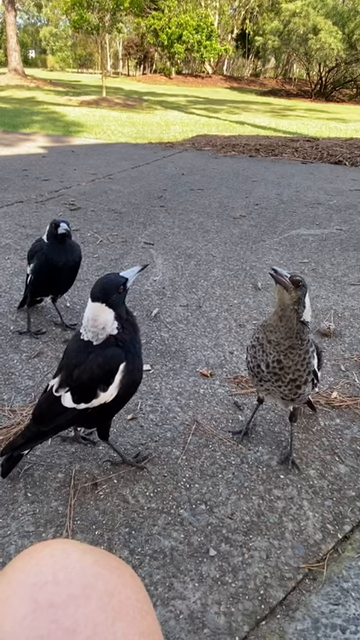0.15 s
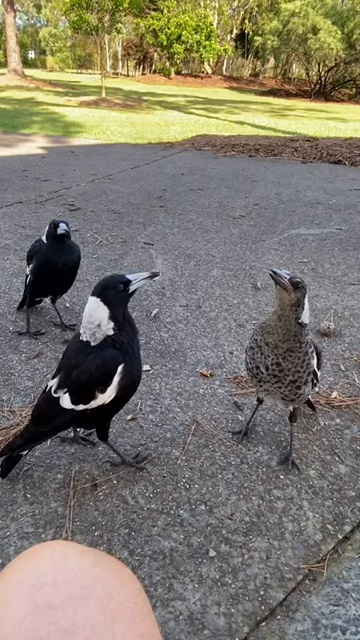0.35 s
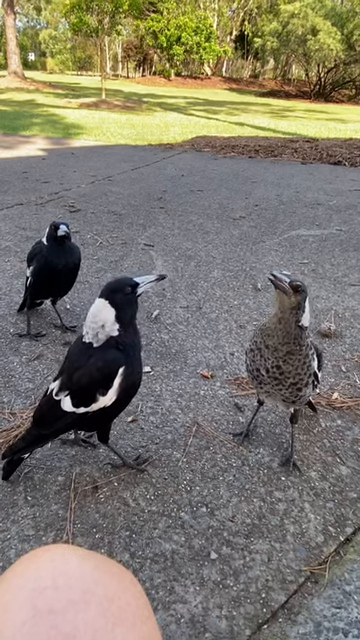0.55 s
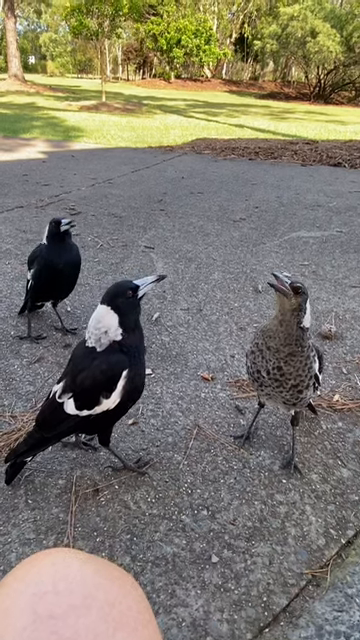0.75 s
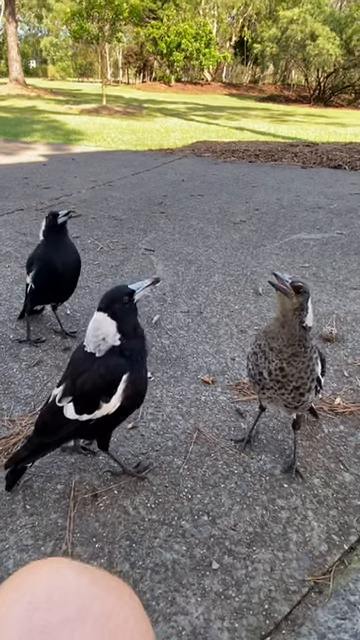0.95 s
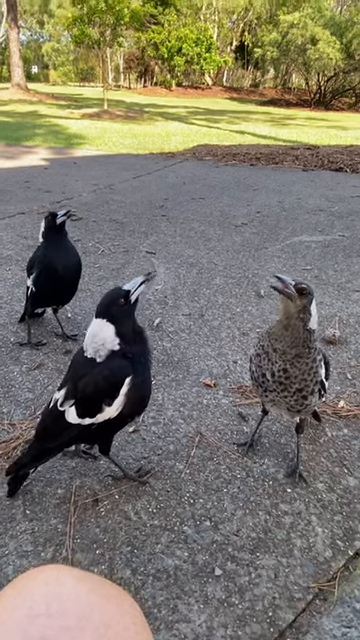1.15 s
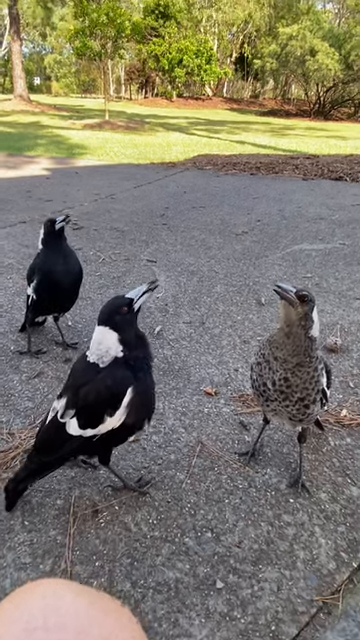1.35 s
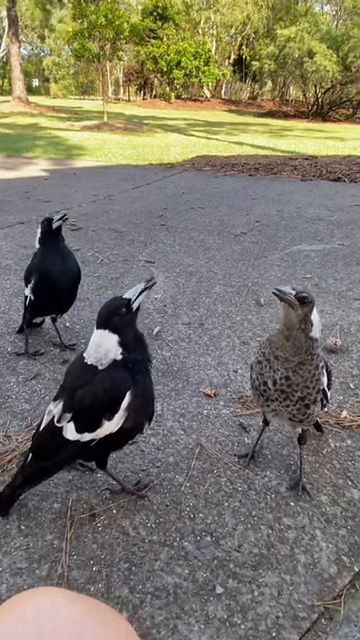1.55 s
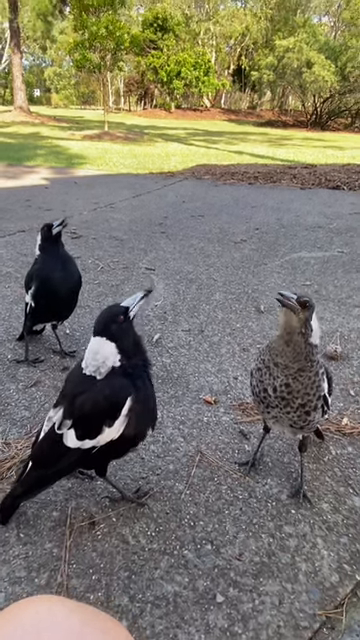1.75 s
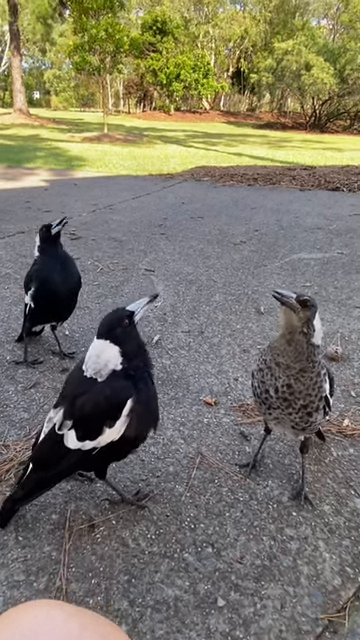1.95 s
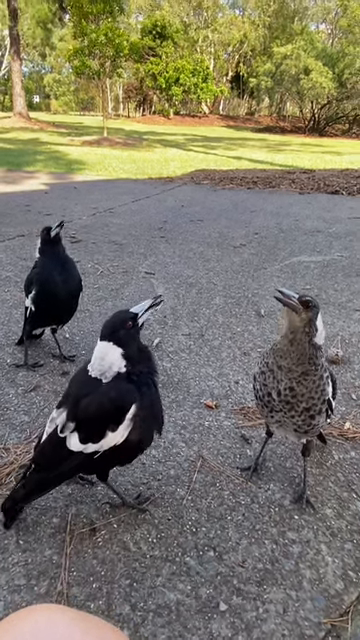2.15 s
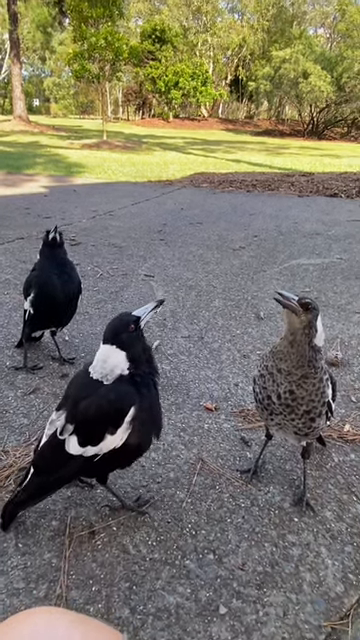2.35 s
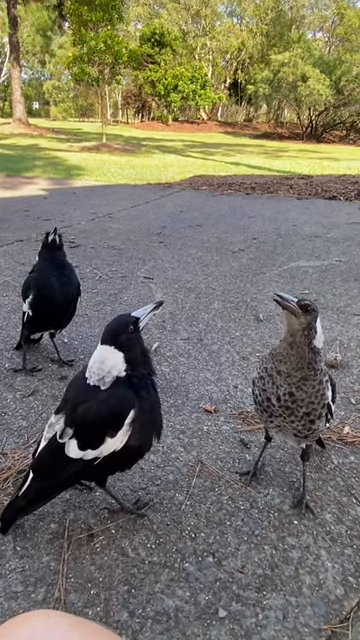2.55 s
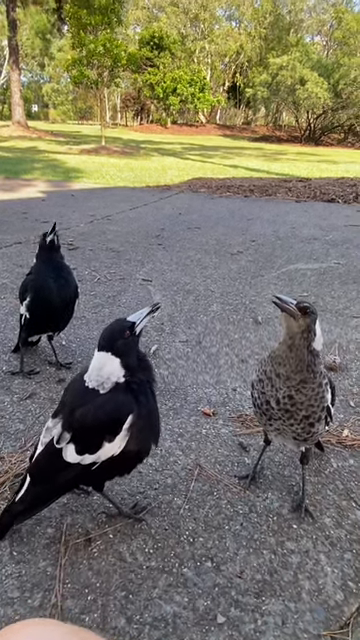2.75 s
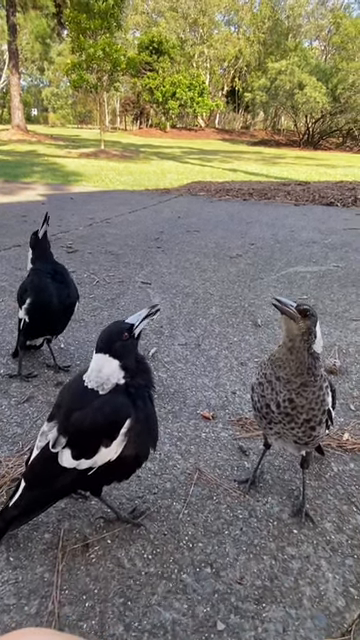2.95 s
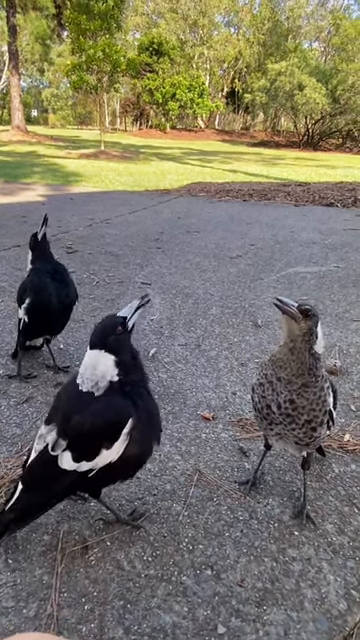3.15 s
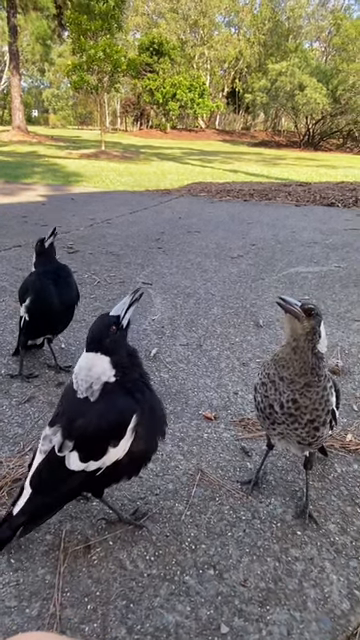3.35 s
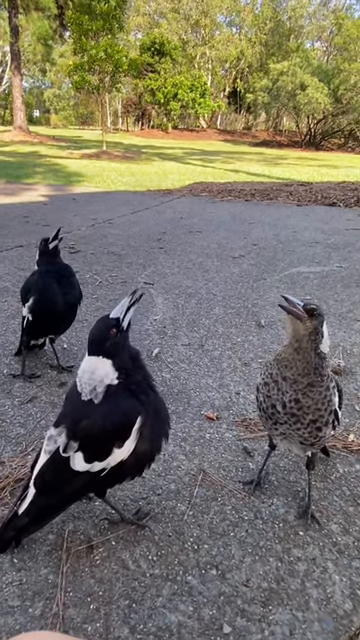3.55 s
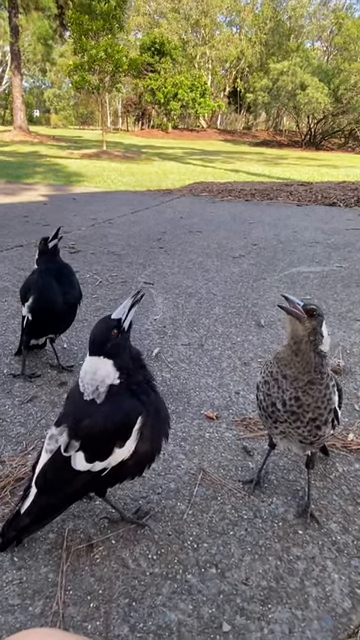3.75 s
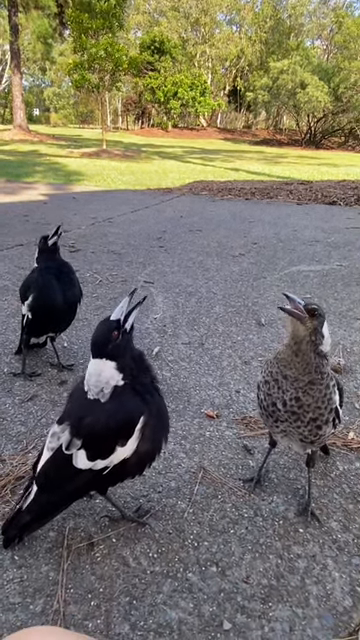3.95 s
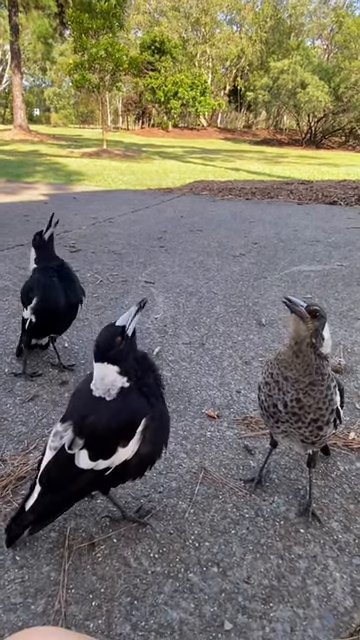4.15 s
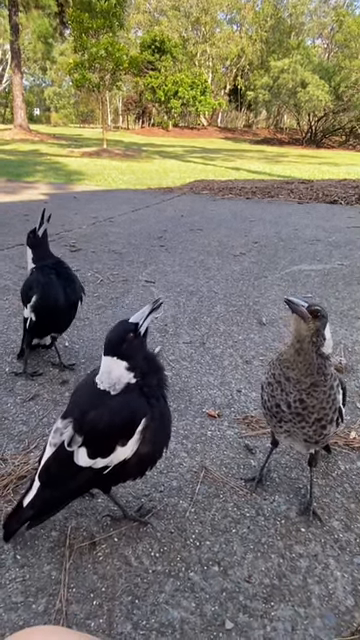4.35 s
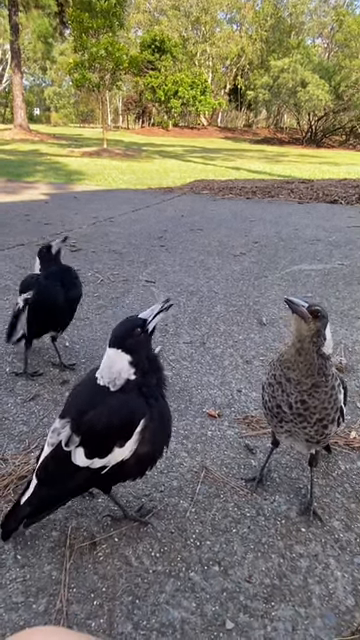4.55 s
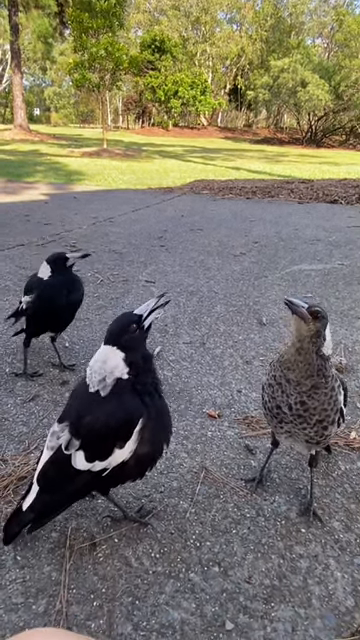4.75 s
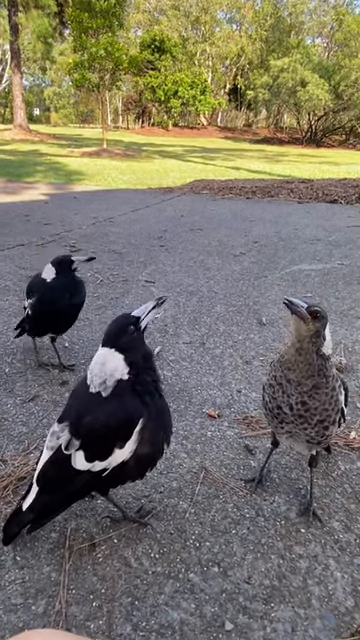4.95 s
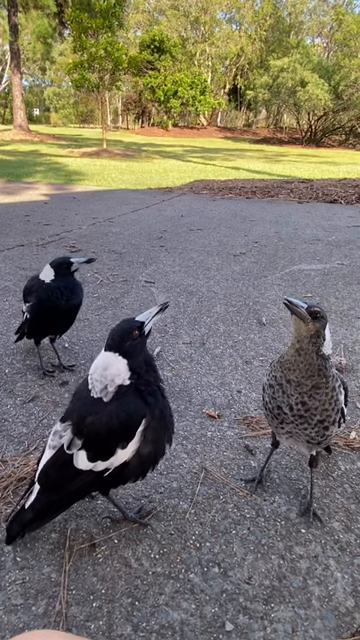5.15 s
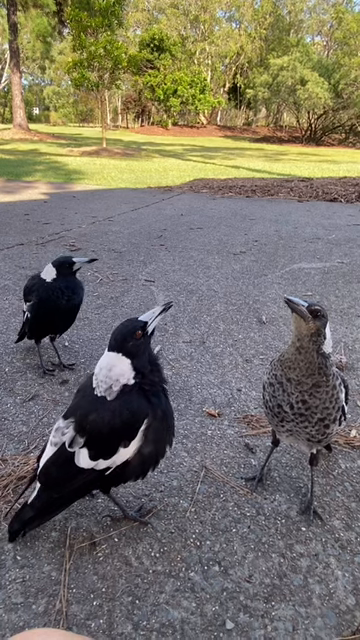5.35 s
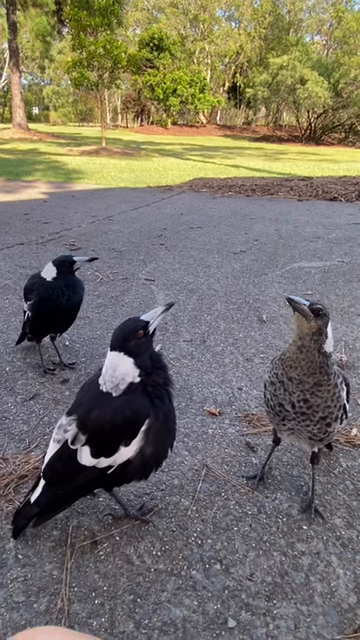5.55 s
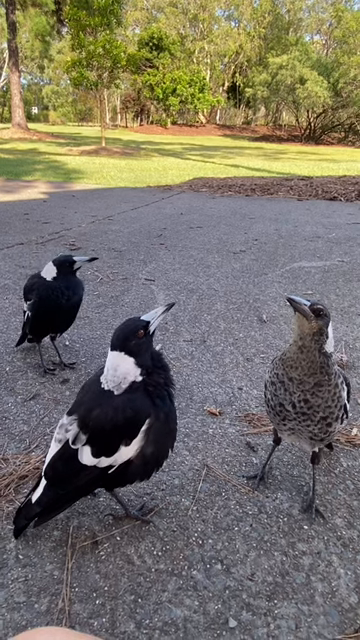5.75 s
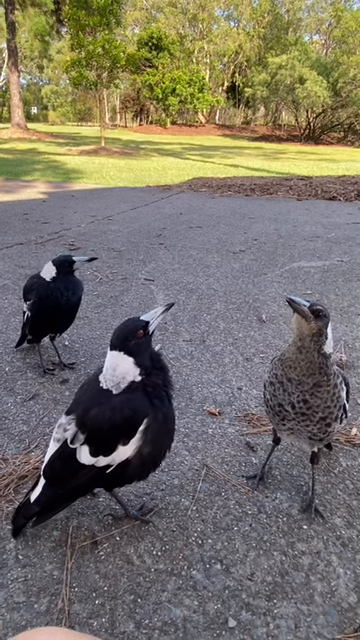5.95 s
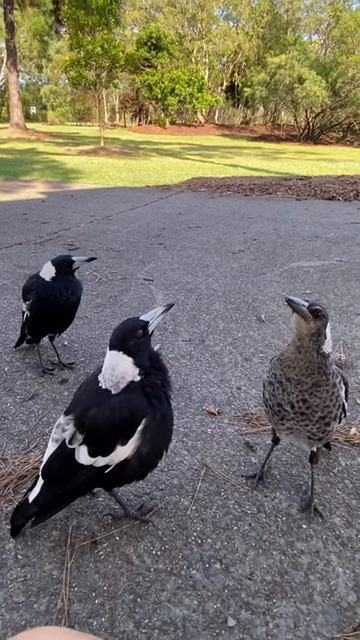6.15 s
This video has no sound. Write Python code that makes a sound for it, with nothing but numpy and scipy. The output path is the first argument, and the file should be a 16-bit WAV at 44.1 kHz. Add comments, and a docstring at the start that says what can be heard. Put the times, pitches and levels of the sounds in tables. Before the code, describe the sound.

Outdoors in a park, a magpie a step from the microphone, slightly left, carols loudly: quick fluty burbles and yodelling flips at first, then longer throbbing, gliding whistles. A second bird further off adds softer notes from the other side. Behind lie a thin cicada hiss and a far traffic and engine drone, which sink midway. The singing fades, and one faint distant chirp follows.

```python
"""Cicadas hiss in the trees of a park over a far engine drone and traffic; then liquid, gliding whistles stand in front.
A magpie carols a step from the microphone, with another further off; one faint distant chirp ends it.
Many notes throb as both sides of the syrinx beat; overtones and rushing air colour them. Dense tymbal clicks blur
into the hiss, and shaped noise makes the road. This background sinks midway and then partly returns."""
import sys
import numpy as np
from scipy import signal
from scipy.fft import rfft, irfft
from scipy.io import wavfile
from scipy.ndimage import uniform_filter1d

SR = 44100
rng = np.random.default_rng(int(sys.argv[2]) if len(sys.argv) > 2 else 0)


def log_audio(samples):
    """Write samples as a 16-bit WAV file to the path given in sys.argv[1]."""
    # one column per channel
    frames = np.atleast_2d(samples).T
    # limit to full scale, then quantise
    limited = np.clip(frames, -1, 1)
    pcm = np.round(limited * 32767).astype(np.int16)
    wavfile.write(sys.argv[1], SR, pcm)


def volts(x):
    """Linear amplitude factor 10**(x/20) for a level x in dB, scalar or array-like."""
    e = np.asarray(x, float) / 20
    return 10 ** e


N = 273420

# drawn notes, long, throbbing or warbling, each with its own pitch line: singer,
# throb (start_hz, end_hz, lower_side_tone_db, upper_side_tone_db, overtone_base_hz) or empty,
# line of (time_s, pitch_hz, level_db)
DRAWN_NOTES = [ ("near", (72, 72, -14, -5, 914.5), [(0.692, 906, -25), (0.715, 892, -18),
               (0.77, 885, -17.5), (0.797, 894, -27)]), ("near", (), [(1.15, 1012, -16), (1.175, 1009, -12),
               (1.235, 1003, -12), (1.262, 982, -24)]), ("near", (), [(1.388, 900, -31), (1.397, 780, -29),
               (1.406, 1250, -25), (1.415, 780, -25), (1.424, 970, -19), (1.437, 830, -23),
               (1.446, 1000, -19), (1.458, 980, -23)]), ("near", (83.5, 86, -8, -12, 1159),
               [(1.625, 1167, -17.5), (1.674, 1180, -14), (1.711, 1140, -13.5), (1.76, 1140, -17)]),
               ("far", (91, 95, -11, -13.5, 1089), [(1.76, 1131, -19.5), (1.805, 1093, -19.5),
               (1.85, 1032, -28.5)]), ("near", (82, 62, -9, -2, 680), [(1.905, 766, -28),
               (1.95, 712, -22.5), (2.1, 699, -24), (2.152, 680, -31)]), ("near", (), [(2.24, 800, -35),
               (2.257, 1000, -24), (2.268, 800, -25), (2.277, 1050, -25), (2.286, 720, -30),
               (2.293, 900, -26), (2.302, 760, -28)]), ("near", (78, 90, -13, -6, 851.5),
               [(2.42, 902, -28.5), (2.471, 853, -14.5), (2.52, 848, -13), (2.555, 828, -23)]),
               ("near", (68.5, 68, -13, 0, 853.5), [(2.706, 970, -18), (2.736, 860, -18), (2.75, 815, -27),
               (2.78, 745, -36)]), ("near", (93, 58, -9, 1, 812), [(2.89, 935, -16), (2.955, 862, -17),
               (3.008, 823, -19.5), (3.115, 814, -22), (3.175, 800, -25)]),
               ("near", (80, 81.5, 1, -10, 1268), [(3.335, 1233, -15.5), (3.412, 1213, -12),
               (3.542, 1187, -16.5), (3.738, 1141, -19), (3.815, 1159, -23)]),
               ("far", (85, 88.5, -17, -15, 1471.5), [(3.8, 1550, -30.5), (3.9, 1495, -28.5),
               (4.002, 1420, -22), (4.065, 1478, -27), (4.14, 1415, -30)]), ("near", (), [(3.82, 1197, -26),
               (3.883, 1140, -17.5), (3.935, 1124, -17.5), (3.987, 1111, -20), (4.05, 1101, -32)]),
               ("near", (130, 215, -26, -1, 897), [(4.09, 914, -32), (4.17, 893, -28.5),
               (4.25, 893, -32.5)]), ("near", (135, 85, -15, -21, 1230), [(4.15, 1330, -20),
               (4.18, 1245, -16.5), (4.239, 1195, -15), (4.272, 1182, -15.5)]), ("near", (),
               [(4.272, 1182, -15.5), (4.35, 1170, -19), (4.42, 1156, -18.5), (4.468, 1122, -29)]),
               ("near", (59.5, 62.5, -1, -1, 1270), [(4.68, 1192, -40), (4.751, 1222, -30.5),
               (4.81, 1174, -26), (4.869, 1206, -26), (4.94, 1183, -39.5)]),
               ("near", (89, 88, -10, -22, 981.5), [(4.93, 972, -37), (4.988, 1002, -30.5),
               (5.035, 978, -23.5), (5.14, 956, -15.5)]), ("near", (), [(5.14, 943, -16.5),
               (5.185, 928, -16.5), (5.23, 931, -16.5)]), ("near", (92, 55, -18, -4, 929),
               [(5.23, 925, -20), (5.301, 926, -20.5), (5.419, 916, -23), (5.49, 882, -35.5)]),
               ("distant", (), [(5.855, 1380, -50), (5.91, 1510, -40), (5.945, 1530, -43)]), ]
# throb of a steady note, its side tones too weak to beat: start_hz, end_hz, lower_side_tone_db, upper_side_tone_db
STEADY_THROB = (80, 80, -50, -50)
# short clear whistles: singer, start_s, length_s, from_hz, to_hz, peak_db
SHORT_WHISTLES = [ ("near", .53, .085, 646, 711, -36), ("near", .55, .065, 800, 877, -29),
                  ("near", .614, .018, 850, 1000, -21), ("near", .64, .01, 760, 1050, -24),
                  ("near", .658, .018, 835, 812, -21), ("near", .855, .02, 1300, 1345, -21),
                  ("near", .867, .016, 990, 950, -21), ("near", .88, .018, 1200, 1137, -18),
                  ("near", .888, .017, 800, 740, -26), ("near", .903, .012, 1000, 840, -18),
                  ("near", 1.022, .023, 1002, 874, -18), ("near", 1.043, .022, 1300, 1400, -17),
                  ("near", 1.06, .045, 945, 955, -21), ("far", 1.152, .03, 1530, 1500, -20),
                  ("near", 1.335, .018, 930, 940, -28), ("near", 1.354, .013, 920, 800, -24),
                  ("near", 1.37, .014, 1200, 1060, -23), ("near", 1.382, .015, 1310, 1350, -24),
                  ("far", 1.5, .06, 925, 964, -20), ("far", 1.56, .065, 1003, 1015, -16),
                  ("near", 1.775, .045, 898, 898, -18.5), ("near", 1.825, .025, 1800, 2050, -38),
                  ("near", 1.845, .05, 1093, 1052, -15), ("near", 2.305, .018, 1220, 1140, -22),
                  ("near", 2.322, .01, 1480, 1700, -30), ("near", 2.332, .018, 1360, 1277, -23),
                  ("near", 2.342, .016, 1000, 940, -28), ("near", 2.355, .02, 1133, 1135, -19),
                  ("near", 2.374, .052, 751, 756, -18), ("near", 2.835, .022, 970, 993, -27),
                  ("near", 2.853, .015, 1540, 1416, -17), ("near", 2.864, .015, 1280, 1340, -7),
                  ("near", 2.879, .015, 1370, 1430, -13), ("near", 3.188, .026, 980, 1000, -19),
                  ("near", 3.215, .018, 950, 1080, -13), ("near", 3.272, .055, 1360, 1365, -21),
                  ("near", 4.0, .065, 1260, 1370, -32), ("near", 4.05, .09, 1165, 1310, -29),
                  ("near", 4.135, .016, 1500, 1420, -23)]
# short two-voiced burbles: singer, start_s, length_s, pitch_hz, second_voice_offset_hz (minus is below), peak_db
TWO_VOICED_BURBLES = [ ("near", .803, .042, 1340, -95, -21), ("near", .94, .08, 820, -55, -18),
                      ("near", 1.068, .026, 1370, -150, -23), ("near", 1.1, .055, 1950, -170, -28),
                      ("near", 1.105, .045, 930, 110, -20), ("near", 1.112, .035, 1250, 120, -31),
                      ("far", 1.18, .03, 1560, -160, -27), ("near", 1.54, .085, 1150, -85, -19),
                      ("near", 2.565, .06, 780, 86, -30), ("near", 2.625, .075, 1355, -105, -31),
                      ("near", 3.235, .028, 1060, -140, -15), ("near", 4.615, .065, 965, 100, -29)]
# rise and fall of a short note: opening_below_peak_db, peak_at (share of length), ending_below_peak_db
WHISTLE_SHAPE = (7, .55, 5)
BURBLE_SHAPE = (5, .5, 5)
# head of the near bird: time_s, beak opening as overtone_db at 1 kHz pitch, turn as left_minus_right_db
NEAR_HEAD = [(.6, -33, 3.5), (1.12, -25, 3.3), (1.38, -36, 3.6), (1.58, -31, 4.8), (1.8, -30, 4.6),
             (2.05, -28, 3.1), (2.35, -34, 3.3), (2.6, -36, 2.7), (2.75, -33, 3.5), (2.845, -14, 5),
             (2.88, -29, 4.3), (3.03, -17, 4), (3.22, -28, 5.3), (3.3, -21, 4), (3.57, -24, 4.3),
             (3.93, -28, 4.6), (4.05, -23, 4), (4.17, -28, 3.6), (4.3, -28, 4), (4.8, -23, 4),
             (5.03, -32, 2.4), (5.35, -29.5, 3.2)]
# birds further off, by singer: overtone_db at 1 kHz pitch, left_minus_right_db
FURTHER_BIRDS = {"far": (-27, -2.4), "distant": (-38, -2)}
# throat colour of the overtones: frequency_hz, level_db
THROAT = [(1400, -1), (1900, 3), (2500, -1.5), (3200, -10.5), (4400, 2.5), (6000, -5), (7400, -37.5),
          (8800, -6), (10500, -25.5), (11700, -8), (13000, -21.5), (15000, -29.5)]
# phase between the microphone's two sides: frequency_hz, left_lead_radians
LEFT_LEAD = [(0, 0), (1120, -.55), (2200, -.15), (4100, -.7), (4700, -2.4), (5500, .3), (6600, 2.9),
             (8300, 6.2), (15000, 9)]
# air rushing through rough notes: frequency_hz, density_db (per Hz)
BREATH_COLOUR = [(900, 4), (1600, -9), (2600, -10.5), (3500, -17.5), (5000, -8), (7000, -7.5),
                 (7600, -43.5), (8700, 1.5), (11000, -31.5), (13200, -14), (14500, -40)]
# thin hiss in the top octave beside some notes: start_s, length_s, level_db
HISS_TIMES = [(1.53, .09, -52), (2.87, .35, -42), (3.88, .12, -53), (4.13, .14, -53)]
# colour of that hiss: frequency_hz, density_db (per Hz)
HISS_COLOUR = [(11600, -25), (12300, 0), (13800, -2), (14400, -30)]
# cicada chorus, common to both ears and then opposed in them: frequency_hz, density_db (per Hz)
CICADAS_MID = [(2800, -34), (3900, -28.5), (4400, -4), (5100, 0), (6700, -0.5), (7400, -24.5),
               (8200, -11.5), (10200, -31), (11200, -63), (12200, -20.5), (13800, -22), (15000, -47)]
CICADAS_SIDE = [(2800, -27), (4000, -35), (4600, -9), (5500, -12), (6800, 1), (7800, -10.5), (8300, -32),
                (11000, -56.5), (12200, -31), (15000, -30)]
# far traffic: frequency_hz, density_db (per Hz)
TRAFFIC_COLOUR = [(15, -51.5), (25, -27.5), (54, -12), (81, 2), (154, -15), (992, -29), (1300, -27.5),
                  (2130, -34), (3500, -47.5), (4550, -83)]
# engine resonances: pitch_hz, width_hz, level_db
ENGINE_LINES = [(65.5, 18, 1), (83.9, 3.3, -2), (129.9, 5.4, 1.5)]
# gains of the background over time: time_s, cicadas_db, road_db
BACKGROUND_GAINS = [(.14, -35.5, -36.5), (1, -36.5, -37.5), (2.2, -39, -40), (3.352, -38, -39.5),
                    (3.5, -42.5, -48), (4.501, -50, -50.5), (5.5, -47.5, -48), (6.2, -42, -45)]


def level(x, db):
    """Set the rms level."""
    return x * volts(db) / np.sqrt(np.mean(x ** 2))


def colour(x, points):
    """Shape the spectrum by (Hz, dB) points, joined over log frequency."""
    hz, db = np.transpose(points)
    bins = np.maximum(np.arange(N // 2 + 1) * SR / N, 1)
    gain = volts(np.interp(np.log(bins), np.log(hz), db, left=-90, right=-90))
    return irfft(rfft(x) * gain, N)


def walk(rate):
    """Random levels held 1 / rate s and slewed twice; spread near 1."""
    hold = int(SR / rate)
    steps = np.repeat(rng.standard_normal(N // hold + 1), hold)
    return 1.405 * uniform_filter1d(uniform_filter1d(steps, hold), hold)[:N]


def magpies():
    """All notes of the syrinx, a note begun inside another taking up its phase, with breath and top hiss."""
    song, air, phase = np.zeros((2, N)), np.zeros(N), np.zeros(N)
    drifts = walk(90), walk(320), walk(45)
    t = np.arange(N) / SR
    notes = carol()
    voices = {bird: np.zeros(N) for bird in ("near", *FURTHER_BIRDS)}  # notes sounding at once
    for bird, _, rows in notes:
        voices[bird] += (t > rows[0, 0]) * (t < rows[-1, 0])
    everyone = sum(voices.values())
    for bird, throb, rows in notes:
        rivals = np.maximum(voices[bird] - 1, 0) + .3 * (everyone - voices[bird])
        rivals = uniform_filter1d(rivals, SR // 100)
        span, sound, rush, turn = note(rows, pose(bird, rows), throb, phase, drifts, rivals)
        song[:, span] += sound
        air[span] += rush
        phase[span] = turn
    return song + air * breath() + top_hiss()


def carol():
    """Every note as (singer, throb, line), in time order; a burble is a voice with a second one beating on it."""
    sag_per_s = .25  # share of a burble's pitch lost each second
    second_voice_db, mirror_tone_db = -1.5, -14  # on the second voice's side, and opposite
    notes = [(bird, throb, np.array(rows)) for bird, throb, rows in DRAWN_NOTES]
    notes += [(bird, (), swell(*row, WHISTLE_SHAPE)) for bird, *row in SHORT_WHISTLES]
    for bird, start_s, length_s, hz, apart_hz, peak_db in TWO_VOICED_BURBLES:
        sag_hz = hz * sag_per_s * length_s / 2
        rows = swell(start_s, length_s, hz + sag_hz, hz - sag_hz, peak_db, BURBLE_SHAPE)
        tones_db = (mirror_tone_db, second_voice_db)
        if apart_hz < 0:
            tones_db = tones_db[::-1]
        throb = (abs(apart_hz), abs(apart_hz), *tones_db, np.mean(rows[:, 1]))
        notes.append((bird, throb, rows))
    return sorted(notes, key=lambda n: n[2][0, 0])


def swell(start_s, length_s, from_hz, to_hz, peak_db, shape):
    """Line (s, Hz, dB) of a short note: a straight glide that swells and sinks."""
    open_db, share, end_db = shape
    at = np.array([0, share, 1])
    time_s = start_s + at * length_s
    pitch_hz = from_hz + at * (to_hz - from_hz)
    level_db = peak_db - np.array([open_db, 0, end_db])
    return np.transpose([time_s, pitch_hz, level_db])


def pose(bird, rows):
    """Overtone level and direction of a note: an open beak and a high pitch sound brighter."""
    db_per_octave = 15
    quick_s, quick_dull_db = .06, -7  # full dulling up to half this length, none beyond it
    s, beak_db, turn_db = np.transpose(NEAR_HEAD)
    middle = (rows[0, 0] + rows[-1, 0]) / 2
    near = np.interp(middle, s, beak_db), np.interp(middle, s, turn_db)
    bright_db, pan_db = near if bird == "near" else FURTHER_BIRDS[bird]
    octaves = np.log2(np.mean(rows[:, 1]) / 1000)
    quick = np.clip(2 - 2 * (rows[-1, 0] - rows[0, 0]) / quick_s, 0, 1)
    return bright_db + db_per_octave * octaves + quick_dull_db * quick, pan_db


def note(rows, bright_pan_db, throb, phase, drifts, rivals):
    """One whistle with side tones one throb apart and overtones; also its breath level and running phase."""
    s, hz, db = np.transpose(rows)
    bright_db, pan_db = bright_pan_db
    throb_hz, end_hz, low_db, up_db, base_hz = throb or (*STEADY_THROB, np.mean(hz))
    length_s = s[-1] - s[0]
    edge_s = min(.008, .3 * length_s)
    span = slice(int((s[0] - edge_s) * SR), int((s[-1] + edge_s) * SR))
    t = np.arange(span.start, span.stop) / SR
    fade = np.sin(np.pi / 4 * np.clip(1 + np.minimum(t - s[0], s[-1] - t) / edge_s, 0, 2)) ** 2

    waver, flutter, patches = drifts
    low, up = volts(low_db), volts(up_db)
    rough = min(low + up, 1)
    shaky = rough * min(.07 / length_s, 1) ** 2  # short burbles waver, long rolls hold steady
    pitch = np.interp(t, s, hz) * (1 + (.0006 + .001 * rough + .025 * shaky) * waver[span])
    turn = phase[span.start] + 2 * np.pi * np.cumsum(pitch) / SR
    line_db = np.interp(t, s, db)
    size = np.sqrt(2) * volts(line_db + (.2 + 1.6 * shaky) * flutter[span]) * fade

    throb_rate = np.linspace(throb_hz, end_hz, len(t)) * (1 + (.012 + .15 * shaky) * waver[::-1][span])
    throb_turn = 2 * np.pi * np.cumsum(throb_rate) / SR + (np.pi if up > low else 0)  # opens from a lull
    beat = np.exp(1j * throb_turn)
    under = low * np.exp(-2.8j) / beat
    ladder = min(volts(-7) * up, .35)  # each further upper side tone is this much weaker
    body = 1 + up * beat / (1 - ladder * beat) + under * (1 + volts(-13) * under)

    sides = np.array([[1], [-1]])
    # the left's lead follows the turn of the head, full at 4.2 dB
    lead = np.interp(np.mean(hz), *np.transpose(LEFT_LEAD)) * pan_db / 4.2
    whistle = np.real(body * np.exp(1j * (turn + sides * lead / 2)))
    whistle = whistle / np.sqrt(1 + low ** 2 + up ** 2) * volts(sides * pan_db / 2)

    # overtone pitch swings once every throb, so overtones smear into pulsing bands
    stretch = base_hz / np.mean(hz)
    since_start = throb_turn - throb_turn[0]
    climb = -.04 * rough * (base_hz / 1000) ** 1.5 * np.sin(since_start)
    swept = 2 * np.pi * np.cumsum(stretch * pitch * (1 + climb)) / SR
    # ragged cycles, more so against another voice
    ragged = .03 + .26 * rough + .45 * shaky + .35 * rivals[span]
    swept = swept + ragged * flutter[::-1][span]
    pulse = 1 - .55 * rough * np.cos(since_start - .7)
    pulse = pulse * volts(.4 * (line_db - max(db)))  # softer singing is purer
    upper = overtones(hz, stretch, pitch, swept, bright_db, patches, span)
    return span, (whistle + pulse * upper) * size, size * pulse * rough * volts(bright_db), turn


def overtones(hz, stretch, pitch, swept, bright_db, patches, span):
    """Harmonics of the whistle, filtered by the throat; each comes and goes on its own."""
    throat_hz, throat_db = np.transpose(THROAT)
    sides = np.array([[1], [-1]])
    pan = volts(sides * -1.6 / 2)  # the microphone favours the right above the whistle
    total = np.zeros((2, len(pitch)))
    for k in range(2, int(throat_hz[-1] / max(hz) / stretch)):
        lead = np.interp(k * np.mean(hz), *np.transpose(LEFT_LEAD))
        gain_db = bright_db + np.interp(np.log(k * stretch * pitch), np.log(throat_hz), throat_db)
        gain_db = gain_db + 2.2 * np.roll(patches, k * SR // 5)[span]
        gain_db = gain_db - 2.5 * np.clip(k - 3, 0, 2)  # the fourth and up are weaker
        total += volts(gain_db) * pan * np.cos(k * swept + sides * lead / 2)
    return total


def breath():
    """Air rushing through the syrinx: coloured noise, mostly common to both ears."""
    mid, side = (level(colour(rng.standard_normal(N), BREATH_COLOUR), db) for db in (-5, -14))
    return np.array([mid + side, mid - side])


def top_hiss():
    """A thin high band of noise, independent in each ear, swelling in 20 ms and sinking over its later half."""
    t = np.arange(N) / SR
    size = np.zeros(N)
    for s, length, db in HISS_TIMES:
        size += volts(db) * np.clip(np.minimum((t - s) / .02, (s + length - t) / (.5 * length)), 0, 1)
    return size * np.array([level(colour(rng.standard_normal(N), HISS_COLOUR), 0) for _ in range(2)])


def park(x, t60_s=0.33, wet_db=-20.5, gap_s=0.01):
    """Scatter from paving and trunks: a short decaying noise tail, other in each ear."""
    t = np.arange(SR // 2) / SR
    tail = rng.standard_normal((2, len(t))) * np.exp(-np.log(1000) * t / t60_s) * (t > gap_s)
    tail = tail / np.sqrt(np.sum(tail ** 2) / 2)
    return x + volts(wet_db) * signal.fftconvolve(x, tail, axes=1)[:, :N]


def cicadas(points, balance_db, clicks_per_s, spread_db):
    """Dense uneven tymbal clicks ringing in the treble, blurred into a chorus."""
    clicks = (rng.random(N) < clicks_per_s / SR) * rng.standard_normal(N)
    clicks = clicks * volts(spread_db * rng.exponential(size=N))
    return level(colour(clicks * volts(walk(14)), points), balance_db)


def trees():
    """The chorus around the microphone: one part common to both ears, one opposed in them."""
    mid = cicadas(CICADAS_MID, 0.033, 9000, 0.4)
    side = cicadas(CICADAS_SIDE, 2.5, 5000, 1.8)
    return np.array([mid + side, mid - side])


def engine_drone():
    """Far engine: noise narrowed to a few low resonances."""
    hz = np.arange(N // 2 + 1) * SR / N
    lines = sum(volts(db) / np.sqrt(w) / (1 + (2 * (hz - f) / w) ** 2) for f, w, db in ENGINE_LINES)
    return level(irfft(rfft(rng.standard_normal(N)) * lines, N), -3.7)


def road():
    """Far traffic, nearly the same in both ears in the bass, wavering together with the engine drone."""
    mid = level(colour(rng.standard_normal(N), TRAFFIC_COLOUR), 0.66)
    high_pass = signal.butter(3, 520, "high", fs=SR, output="sos")
    wide = signal.sosfilt(high_pass, np.roll(mid, N // 3))
    side = .7 * wide + .04 * np.roll(mid, N // 2)
    return (mid + engine_drone()) * volts(walk(4)) + side * np.array([[1], [-1]])


def scene():
    """Birds in front, insects and road behind."""
    s, *columns = np.transpose(BACKGROUND_GAINS)
    trees_db, road_db = (np.interp(np.arange(N) / SR, s, c) for c in columns)
    return park(magpies()) + trees() * volts(trees_db) + road() * volts(road_db)


def band_limit(x):
    """A steep low-pass at the top of the band."""
    return signal.sosfilt(signal.butter(12, 15900, fs=SR, output="sos"), x)


def record(dry):
    """The microphone opens after a short silence."""
    start_s = .137
    mix = dry * (np.arange(N) / SR > start_s)
    return band_limit(mix)


dry = scene()
out = record(dry)
log_audio(out)
```